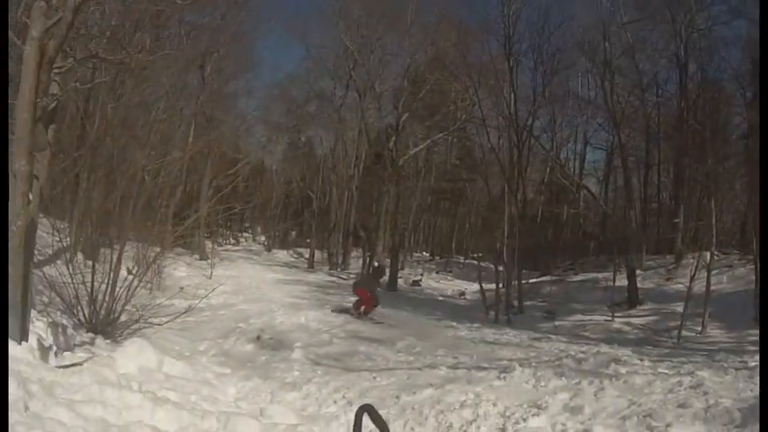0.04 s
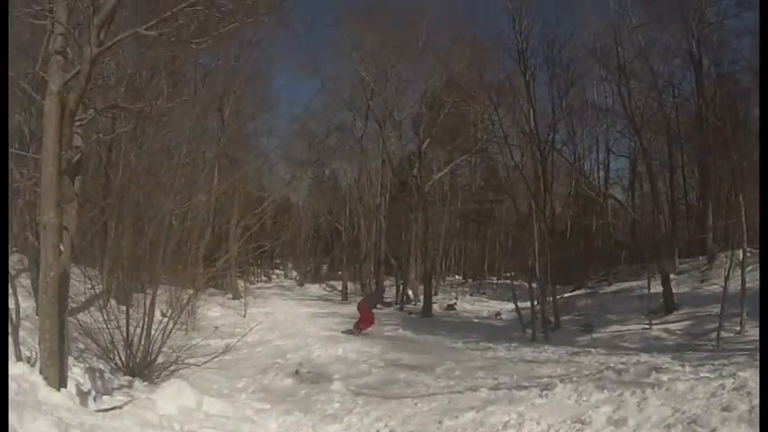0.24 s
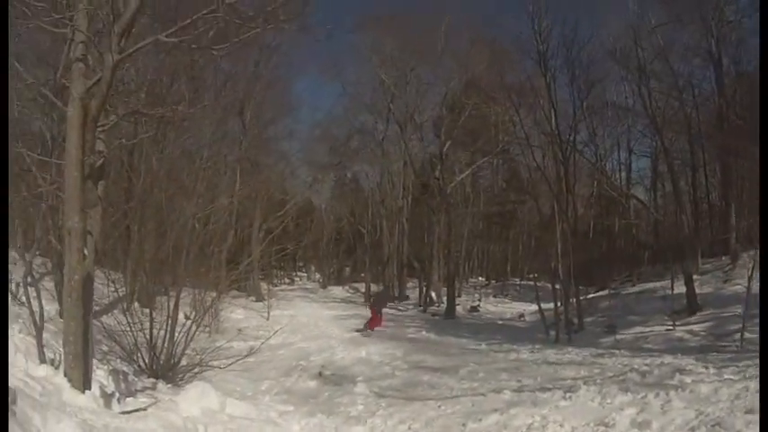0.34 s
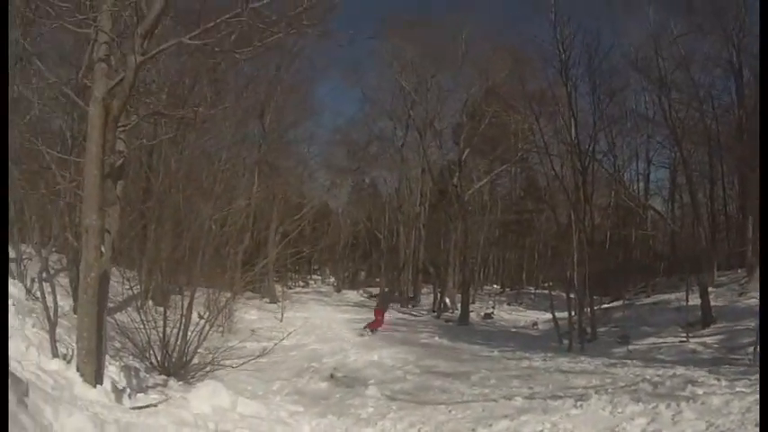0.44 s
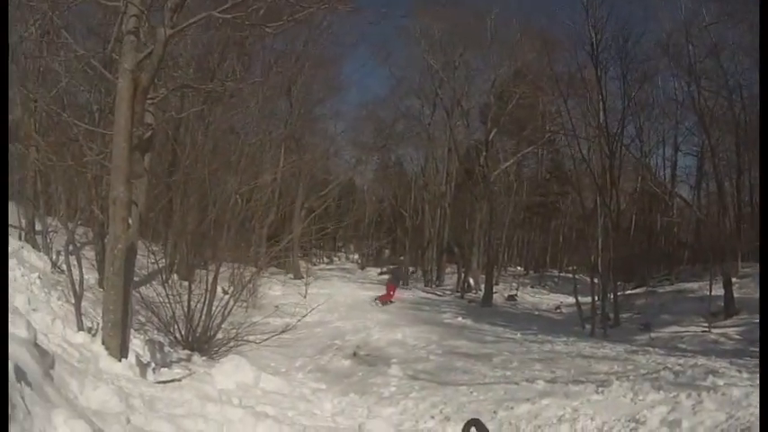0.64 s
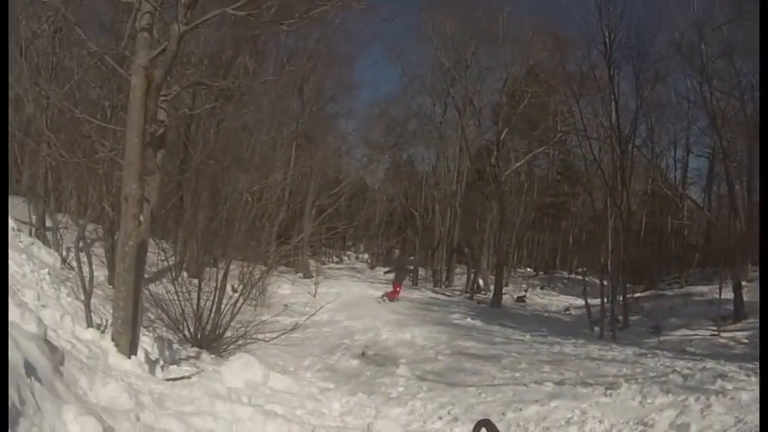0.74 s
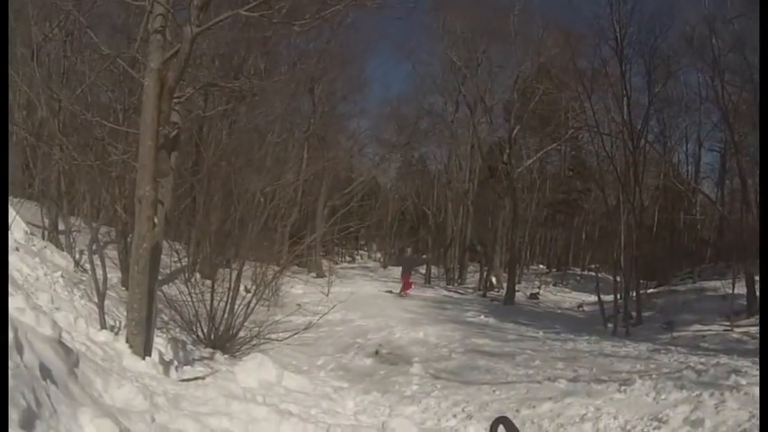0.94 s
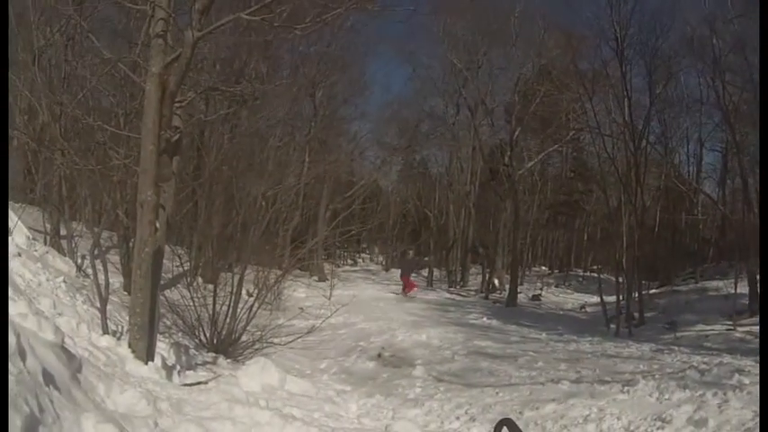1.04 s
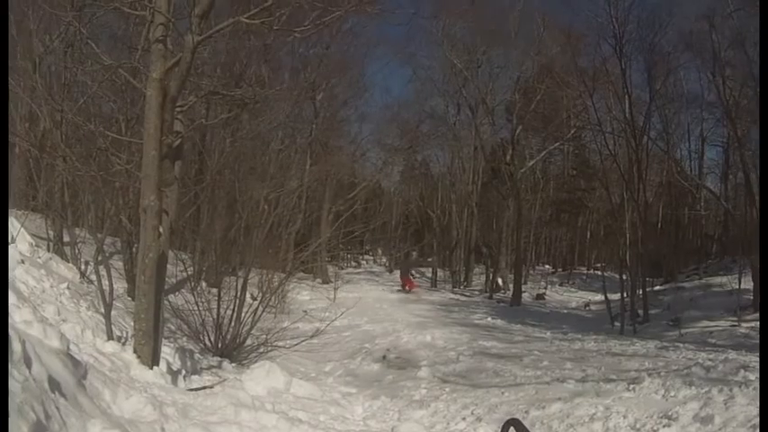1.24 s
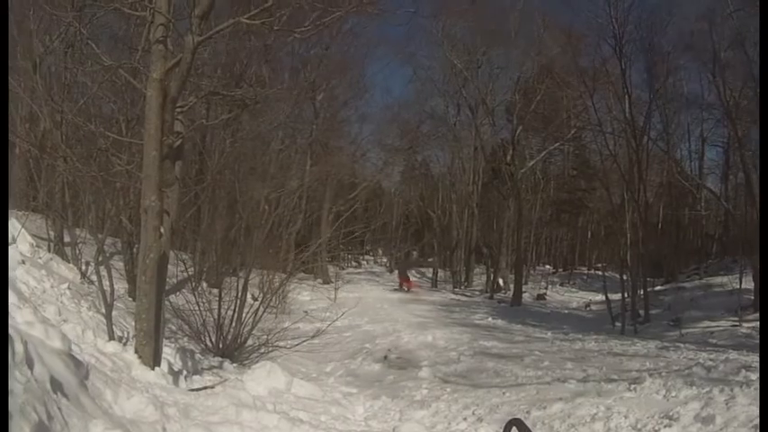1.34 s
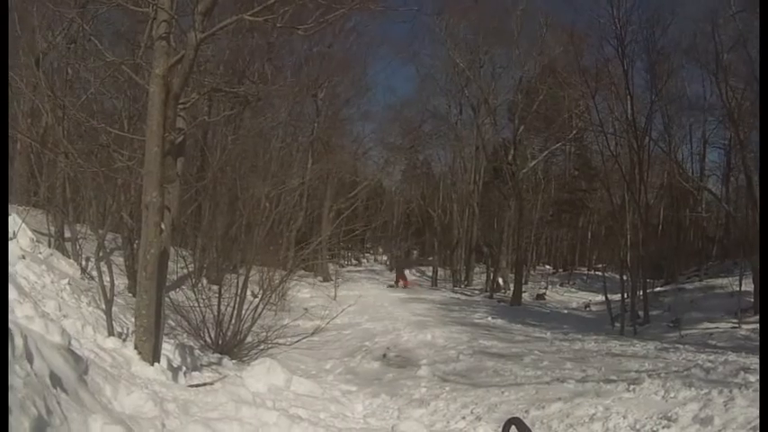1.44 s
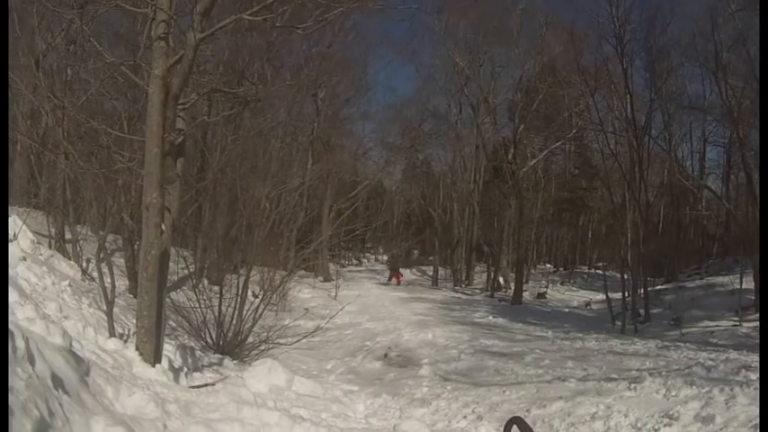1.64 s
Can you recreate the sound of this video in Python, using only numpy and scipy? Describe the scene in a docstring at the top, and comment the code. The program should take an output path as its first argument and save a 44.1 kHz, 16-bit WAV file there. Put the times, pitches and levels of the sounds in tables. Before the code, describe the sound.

A hard knock strikes the camera's plastic case at about 0.2 seconds, ringing briefly with a dull thud and a rattle of the mount. Gear scuffs the case from 0.4 to 0.9 seconds, loudest at 0.5 with a creak, a squeak and a microphone bump. Light wind rumbles throughout, with a few crisp ticks. A snowboard hisses faintly over snow, slightly stronger after 0.7 seconds.

```python
"""Something hard knocks on the plastic case of a body-worn camera on a snowy trail.
The case rings briefly with a dull thud, and its mount rattles. Then gear scuffs against the case, once
loudly, with a creak and a squeak; the knock and that scuff both jolt the microphone.
All along, snow hisses under a sliding board and light wind rumbles; a few crisp ticks fall in between."""
import sys
import numpy as np
from scipy import signal
from scipy.fft import rfft, irfft, next_fast_len
from scipy.io import wavfile

SR = 44100
rng = np.random.default_rng(int(sys.argv[2]) if len(sys.argv) > 2 else 0)


def bounce(signal):
    """Save signal as a 16-bit WAV file at the path given by the first command-line argument."""
    frames = np.transpose(np.atleast_2d(signal))
    limited = np.clip(frames, -1, 1)
    pcm = np.round(limited * 32767).astype(np.int16)
    wavfile.write(sys.argv[1], SR, pcm)


N = 74970
T = np.arange(N) / SR


def from_db(db):
    """Turn decibels into a number to multiply a sound by."""
    return 10 ** (np.asarray(db) / 20)


def normalise(x):
    """Scale a signal so that its average strength (rms) is 1."""
    return x / np.sqrt(np.mean(x ** 2))


def colour(x, points):
    """Make some pitches louder and others softer, following (f/Hz, level/dB) points."""
    hz, db = np.array(points, float).T
    size = 2 * next_fast_len(N)
    freqs = np.arange(size // 2 + 1) * SR / size
    gain = normalise(from_db(np.interp(np.log(freqs + 1), np.log(hz), db)))
    # build the filter so that it rings after a click, never before it
    cepstrum = irfft(np.log(gain))
    cepstrum[1:size // 2] *= 2
    cepstrum[size // 2 + 1:] = 0
    return irfft(rfft(x, size) * np.exp(rfft(cepstrum)))[:N]


def noise(points):
    """Steady noise with the given tone colour."""
    return normalise(colour(rng.standard_normal(N), points))


def fade(start, decay):
    """A level that jumps up at the start time, then dies away."""
    return (T >= start) * np.exp(-np.maximum(T - start, 0) / decay)


def ring(start, hz, swell):
    """A vibration that grows for swell seconds, then dies away."""
    age = np.maximum(T - start, 0)
    return np.sin(2 * np.pi * hz * age) * (age / swell * np.exp(1 - age / swell)) ** 2


def grains(per_second=5000, spread_db=5.5):
    """Rubbing is a crowd of tiny slips, each a click of random size."""
    clicks = (rng.random(N) < per_second / SR) * rng.choice([-1, 1], N)
    return normalise(clicks * from_db(spread_db * rng.standard_normal(N)))


# pitches the case boosts: f/Hz, width/Hz, gain
CASE_RESONANCES = [(2100, 18, 0.64), (2370, 15, 0.39), (2931, 35, 0.96), (4210, 86, 0.53), (5470, 46, 0.8),
                   (6260, 260, 0.48)]
def through_case(x):
    """The plastic case adds its own ringing to a sound passing through it."""
    return x + sum(gain * signal.lfilter(*signal.iirpeak(hz, hz / width, fs=SR), x)
                   for hz, width, gain in CASE_RESONANCES)


# wind strength: t/s, rumble level/dB, flutter level/dB
GUSTS = [(0, -50.5, -68.5), (0.1, -51.5, -65.5), (0.14, -43.5, -64), (0.19, -48, -67), (0.37, -50.5, -66),
         (0.5, -46.5, -58), (0.62, -49.5, -63), (0.76, -45, -52), (0.95, -44.5, -55), (1.06, -47, -61.5),
         (1.14, -47.5, -54), (1.24, -45.5, -59.5), (1.35, -42, -55), (1.5, -45, -60), (1.7, -43, -55.5)]
# tone colour of the rumble: f/Hz, level/dB
RUMBLE_COLOUR = [(10, -5.5), (27, -1.5), (50, -6), (100, -13), (300, -62)]
# tone colour of the flutter: f/Hz, level/dB
FLUTTER_COLOUR = [(50, -19.5), (105, -2), (175, -2), (400, -14), (2000, -45.5)]
# tone colour of the air's hiss: f/Hz, level/dB
AIR_COLOUR = [(200, 1), (600, -0.5), (1000, -2), (2200, 2), (3200, -2), (3700, -3), (8500, -14.5),
              (13500, -20.5), (15500, -27)]
def wind(air_db=-60.5):
    """Wind buffets the case: a deep rumble and a lighter flutter over a steady hiss of air."""
    time, rumble_db, flutter_db = np.array(GUSTS).T
    rumble = from_db(np.interp(T, time, rumble_db)) * noise(RUMBLE_COLOUR)
    flutter = from_db(np.interp(T, time, flutter_db)) * noise(FLUTTER_COLOUR)
    return rumble + flutter + from_db(air_db) * noise(AIR_COLOUR)


# loudness of the sliding: t/s, level/dB
SLIDE_LEVELS = [(0, -68.5), (0.33, -63.5), (0.6, -67), (0.72, -58.5), (0.83, -56), (1.02, -56),
                (1.075, -58), (1.105, -54), (1.18, -55), (1.21, -60.5), (1.255, -53), (1.3, -58),
                (1.44, -63), (1.6, -59.5), (1.65, -56.5), (1.7, -61)]
# tone colour of the snow: f/Hz, level/dB
SNOW_COLOUR = [(400, -19), (1000, -17.5), (1500, -4.5), (2100, 1), (2800, -2), (3270, -15), (3750, -7),
               (4500, -19), (5700, -13.5), (7800, -33), (15000, -43)]
def board_slide():
    """Snow grains hiss under the board as its pressure changes."""
    time, db = np.array(SLIDE_LEVELS).T
    hiss = normalise(through_case(colour(grains(), SNOW_COLOUR)))
    return from_db(np.interp(T, time, db)) * hiss


# tone colour of the thin hiss: f/Hz, level/dB
THIN_COLOUR = [(3100, -8), (3650, 12), (4200, -4), (5000, 4.5), (7700, -3), (9100, -2), (11200, -17),
               (11850, 5), (12400, -10)]
def thin_hiss(level_db=-66.5, half_faded_s=0.69):
    """A faint high hiss holds steady, then fades out over a tenth of a second."""
    fade_out = np.clip((half_faded_s - T) * 10 + .5, 0, 1)
    return from_db(level_db) * noise(THIN_COLOUR) * fade_out


# crisp ticks: t/s, level/dB
TICKS = [(0.1272, -39), (0.6262, -43), (0.7192, -37.5), (1.0625, -45), (1.1162, -42)]
# their tone colour: f/Hz, level/dB
TICK_COLOUR = [(2000, -18), (8500, 0), (15000, -9)]
def ticks(decay_s=.00015):
    """Tiny bursts of noise make bright clicks, like ice crumbs on the case."""
    bursts = sum(from_db(db) * fade(start, decay_s) for start, db in TICKS)
    return colour(bursts * rng.choice([-1, 1], N), TICK_COLOUR)


# jolts of the microphone: t/s, level/dB, f/Hz, swell/s
JOLTS = [(0.218, -26, 33.5, 0.019), (0.515, -32.5, 29, 0.022)]
def jolts():
    """Each blow sways the microphone for a cycle or two."""
    return sum(from_db(db) * ring(start, hz, swell) for start, db, hz, swell in JOLTS)


# low, dull thuds: t/s, level/dB, f/Hz
THUDS = [(0.2245, -32, 215), (0.2335, -33.5, 146), (0.516, -46, 165), (0.875, -42, 125)]
def thuds(swell_cycles=.65):
    """The knock, the loud scuff and one buffet of wind make low, dull notes that stop quickly."""
    return sum(from_db(db) * ring(start, hz, swell_cycles / hz) for start, db, hz in THUDS)


# rattles of the mount: t/s, level/dB, decay/s
RATTLES = [(0.2267, -32, .007), (0.2353, -34, .002), (0.2372, -29.5, .0009), (0.3987, -42, .0015),
           (0.5164, -38, .003)]
# their tone colour: f/Hz, level/dB
RATTLE_COLOUR = [(150, -3), (400, -5), (900, -13), (1300, -5), (1650, -12), (2200, 2), (2500, -1),
                 (3300, -9), (4200, -8), (6200, -17), (8000, -27), (15500, -35)]
def mount_rattle():
    """The loose mount chatters in short bursts of noise."""
    bursts = sum(from_db(db) * fade(start, decay) for start, db, decay in RATTLES)
    return through_case(colour(bursts * rng.choice([-1, 1], N), RATTLE_COLOUR))


# short notes of the struck case: f/Hz, level/dB, delay/ms, swell/ms
CASE_NOTES = [(624, -25, 0.01, 0.65), (1800, -17, 1.22, 1.04), (2450, -32, 0.54, 1.9),
              (3480, -11, 0.313, 0.24), (4310, -24, 0.5, 0.8), (5900, -28.5, 0.878, 0.44),
              (8300, -27.5, 0.14, 0.15), (12600, -26.5, 0.175, 0.22)]
# softer bounces after the knock: t/s, level/dB
BOUNCES = [(0.2342, -28.5), (0.2415, -40)]
def knock(start_s=0.2274, bounce_hz=2322, bounce_swell_s=0.0024):
    """A hard blow rings many notes of the case at once; two bounces then ring just one."""
    crack = sum(from_db(db) * ring(start_s + delay_ms / 1000, hz, swell_ms / 1000)
                for hz, db, delay_ms, swell_ms in CASE_NOTES)
    bounces = sum(from_db(db) * ring(start, bounce_hz, bounce_swell_s) for start, db in BOUNCES)
    return crack + bounces


# rubs on the case: t/s, level/dB, rise/s, hold/s, decay/s, treble boost/dB
SCUFFS = [(0.397, -46.5, 0.00088, 0.012, 0.012, -3.5), (0.431, -73.5, 0.0037, 0.013, 0.011, 20.5),
          (0.513, -39.5, 0.011, 0.013, 0.0065, 5.5), (0.553, -51.5, 0.0054, 0.018, 0.013, 0),
          (0.62, -49, 0.015, 0.037, 0.035, -3), (0.819, -52, 0.0082, 0.01, 0.038, 0.5)]
# tone colour of the scuffs and the creak: f/Hz, level/dB
RUB_COLOUR = [(120, -4.5), (520, -23), (830, -7.5), (1100, -13), (1600, -5.5), (1850, -2.5), (2080, 2.5),
              (2500, 3.5), (2950, -4), (3300, -15.5), (4100, -8), (5000, -10.5), (6300, -10.5), (7700, -21),
              (9000, -15.5), (13000, -27), (15500, -28)]
def scuffs(treble_from_hz=3370):
    """Gear rubs the case: bursts of tiny slips swell, hold and die away."""
    slips = grains()
    dull = signal.sosfilt(signal.butter(1, treble_from_hz, fs=SR, output="sos"), slips)
    treble = slips - dull
    rubs = 0
    for start, db, rise, hold, decay, treble_db in SCUFFS:
        fade_in = np.clip((T - start) / rise, 0, 1)
        fade_out = np.exp(-np.maximum(T - start - rise - hold, 0) / decay)
        rubs += from_db(db) * fade_in * fade_out * (dull + from_db(treble_db) * treble)
    return through_case(colour(rubs, RUB_COLOUR))


def creak(start_s=0.5122, length_s=.036, level_db=-33, slips_per_s=243, decay_s=0.0007):
    """In the loudest scuff, gear sticks and slips at an even rate; the middle slips are strongest."""
    delays = np.arange(0, length_s, 1 / slips_per_s)
    sizes = np.sin(np.pi * (np.arange(len(delays)) + 1) / (len(delays) + 1))
    slips = sum(size * fade(start_s + delay, decay_s) for delay, size in zip(delays, sizes))
    return from_db(level_db) * through_case(colour(slips * rng.choice([-1, 1], N), RUB_COLOUR))


def squeak(start_s=0.5306, level_db=-32, swell_s=0.0023):
    """At the height of the loudest scuff, very fast sticking and slipping makes a brief high note."""
    return from_db(level_db) * ring(start_s, hz=4090, swell=swell_s)


# scrapes of the board's edge: t/s of the peak, level/dB, half length/s
EDGE_SCRAPES = [(0.917, -60.5, 0.0054), (1.17, -61.5, 0.012), (1.255, -62, 0.016), (1.357, -69, 0.011),
                (1.652, -58, 0.0066)]
# their tone colour: f/Hz, level/dB
EDGE_COLOUR = [(3500, -19), (5600, 4), (6400, 0), (7600, -17), (14000, -37)]
def edge_scrapes():
    """Thin hisses swell and fade as the board's edge bites the snow."""
    swells = sum(from_db(db) * np.exp(-.5 * ((T - peak) / half_length) ** 2)
                 for peak, db, half_length in EDGE_SCRAPES)
    return swells * noise(EDGE_COLOUR)


def scene():
    """All the sounds add up at one microphone."""
    bumps = knock() + thuds() + mount_rattle() + jolts()
    rubbing = scuffs() + creak() + squeak()
    trail = board_slide() + edge_scrapes() + wind() + thin_hiss() + ticks()
    return (bumps + rubbing + trail)[None]


def record(dry, top_hz=15000):
    """The camera cuts off the very highest pitches."""
    return signal.sosfilt(signal.ellip(8, .2, 70, top_hz, fs=SR, output="sos"), dry)


dry = scene()
out = record(dry)
bounce(out)
```